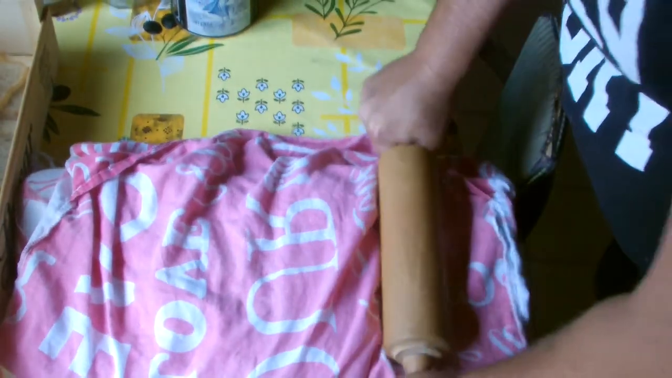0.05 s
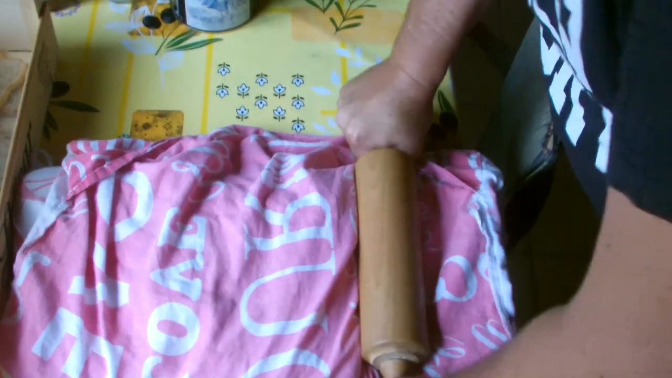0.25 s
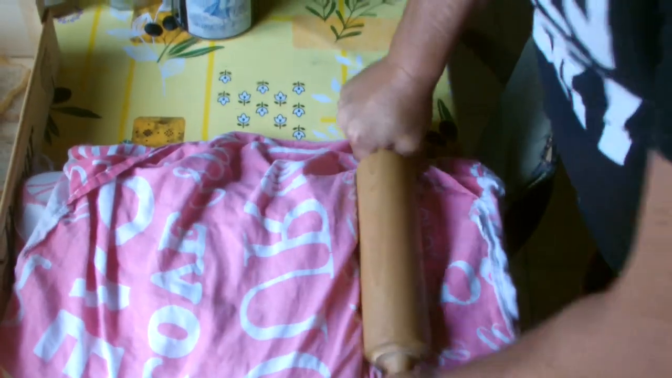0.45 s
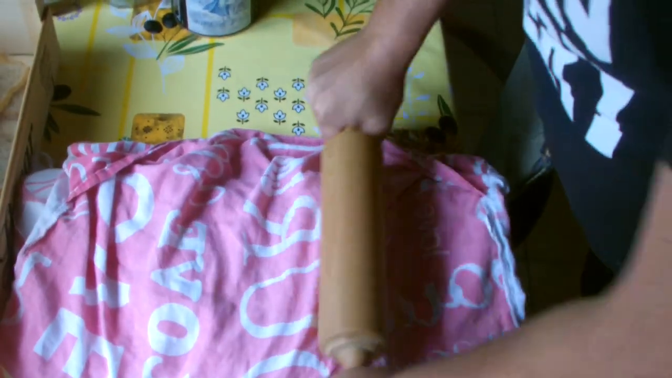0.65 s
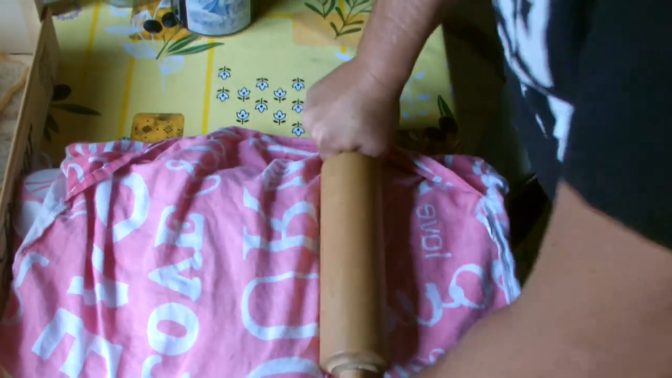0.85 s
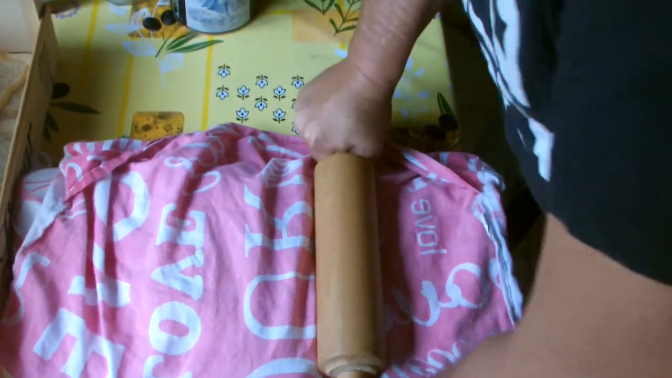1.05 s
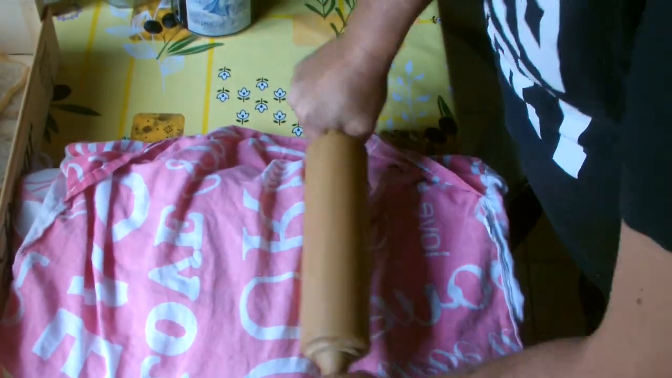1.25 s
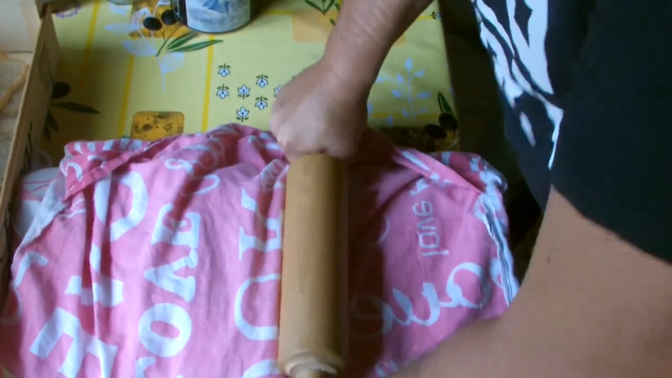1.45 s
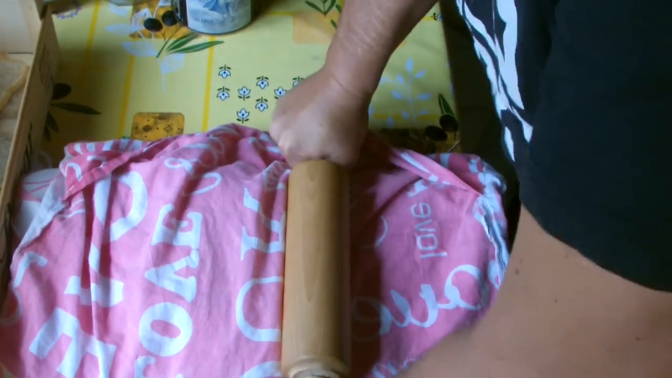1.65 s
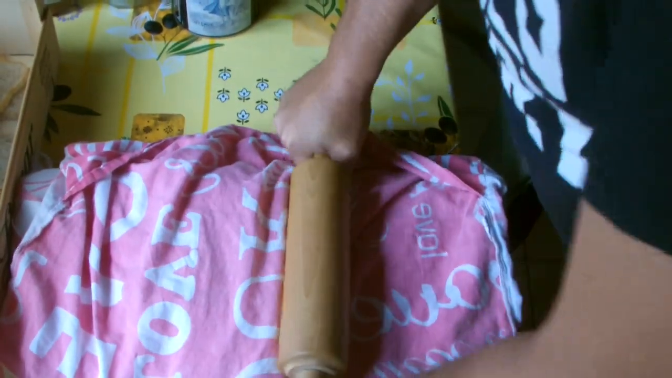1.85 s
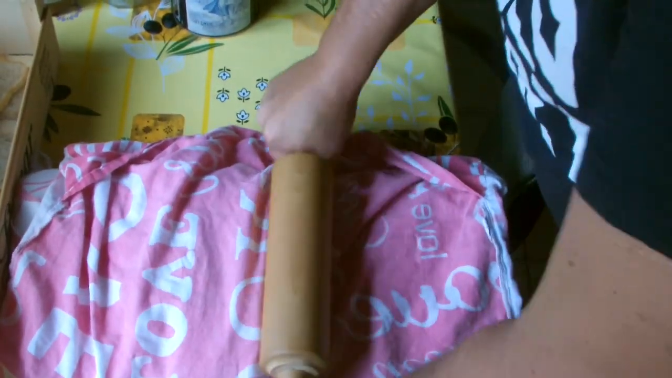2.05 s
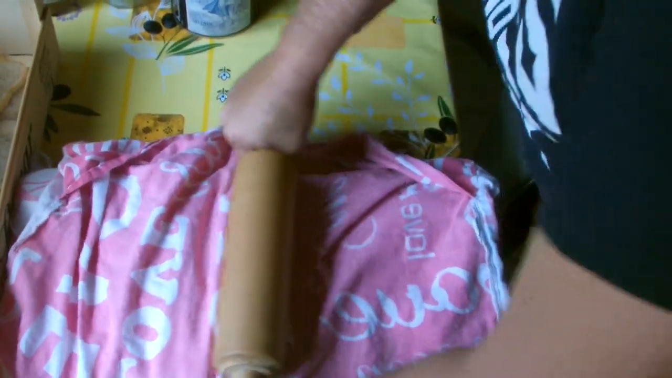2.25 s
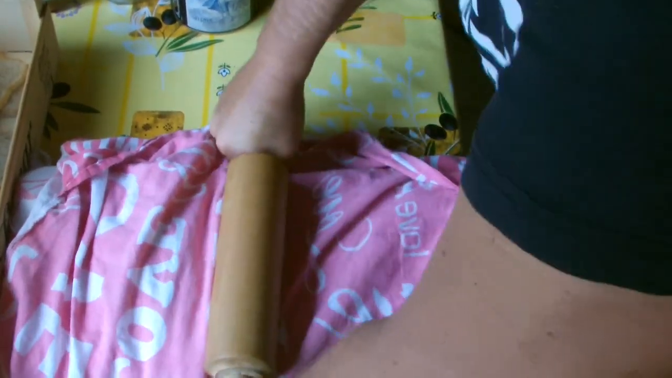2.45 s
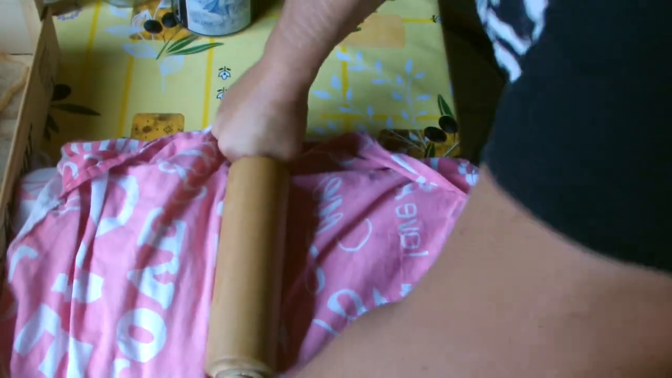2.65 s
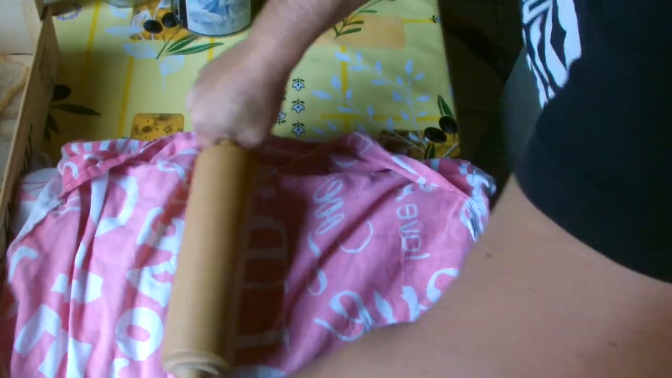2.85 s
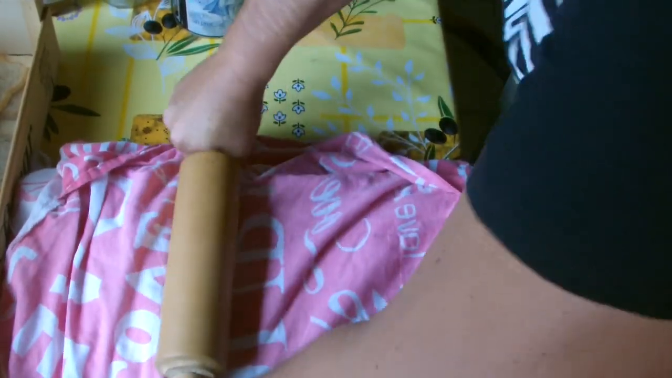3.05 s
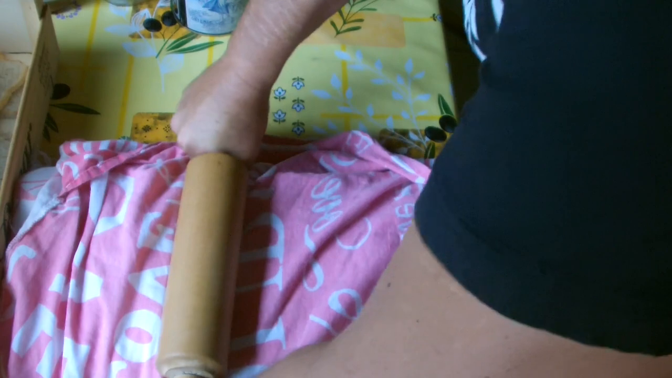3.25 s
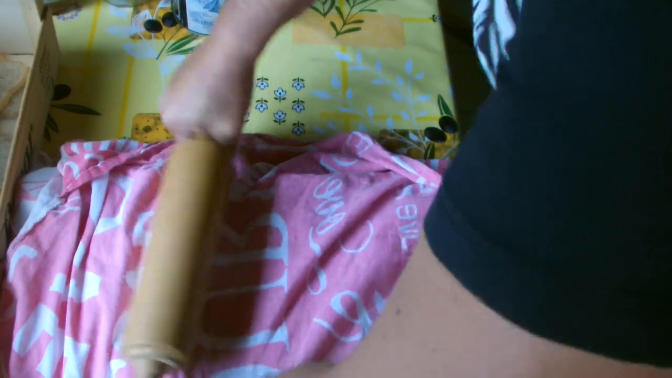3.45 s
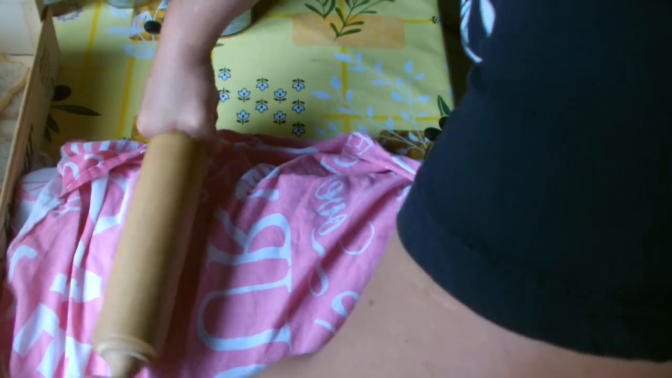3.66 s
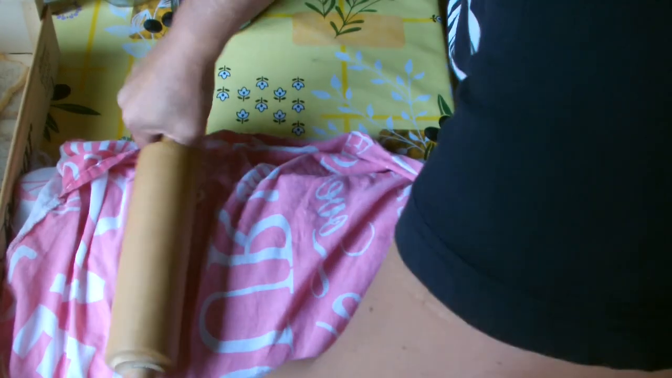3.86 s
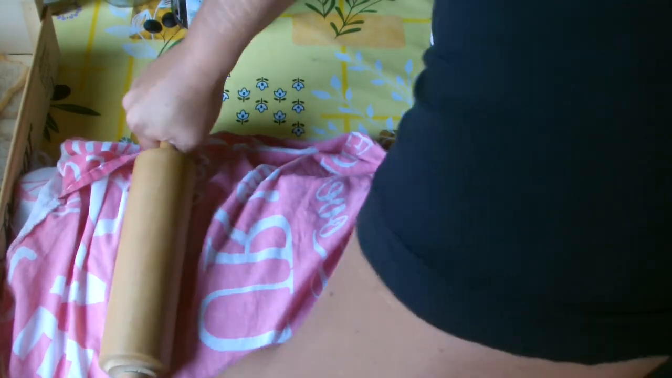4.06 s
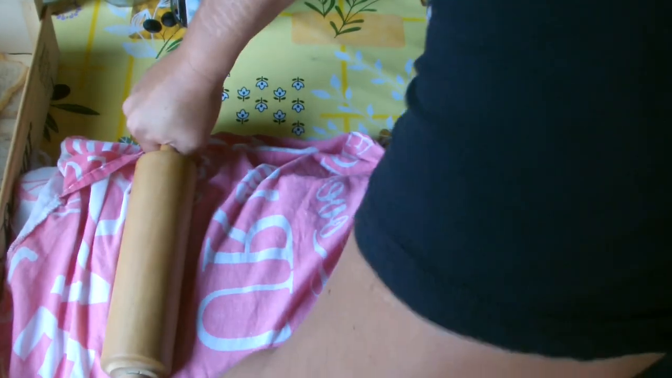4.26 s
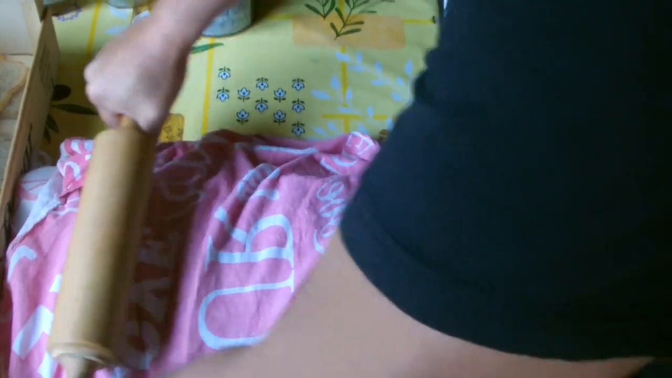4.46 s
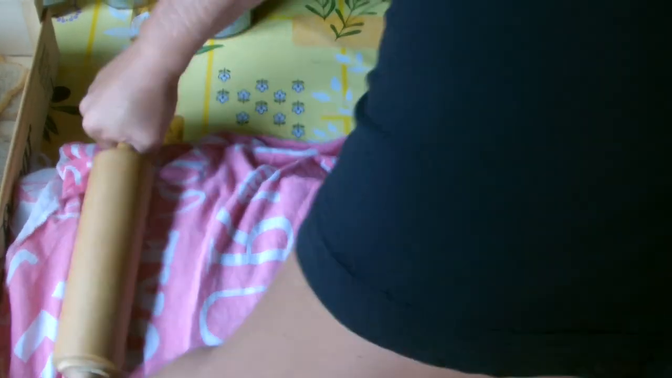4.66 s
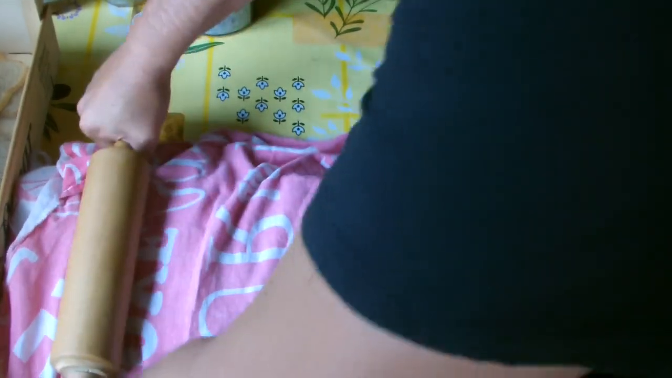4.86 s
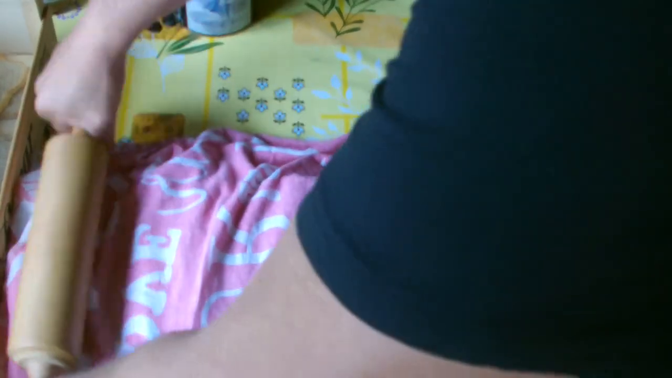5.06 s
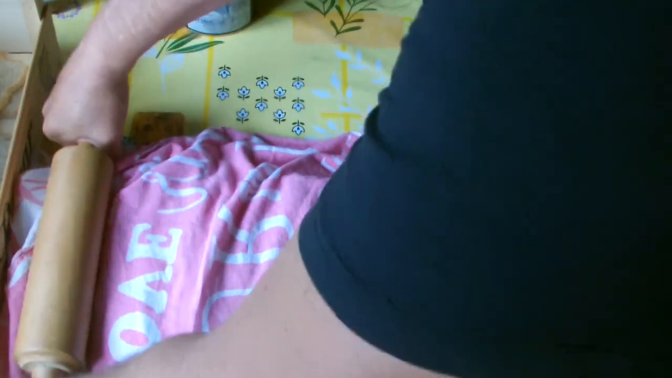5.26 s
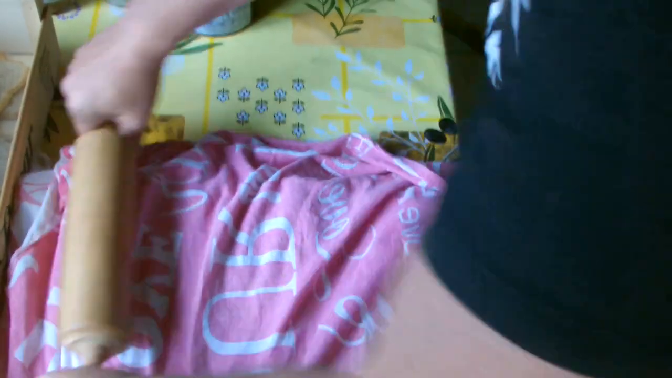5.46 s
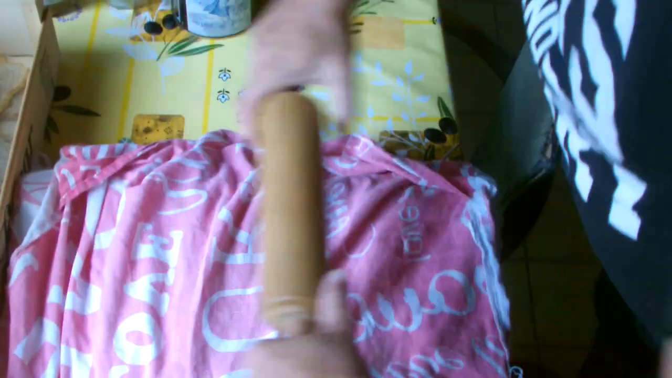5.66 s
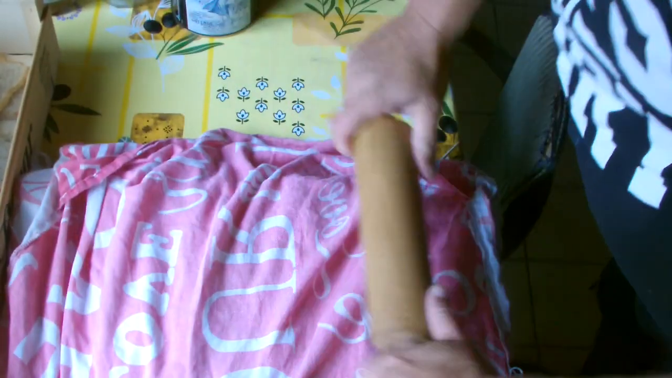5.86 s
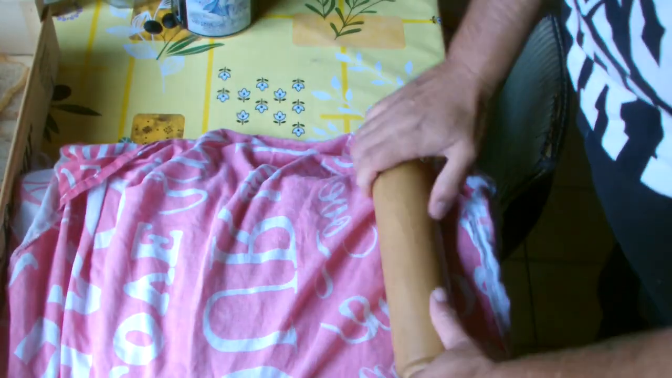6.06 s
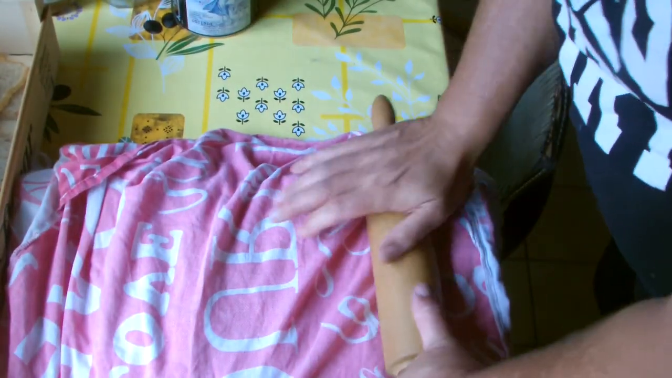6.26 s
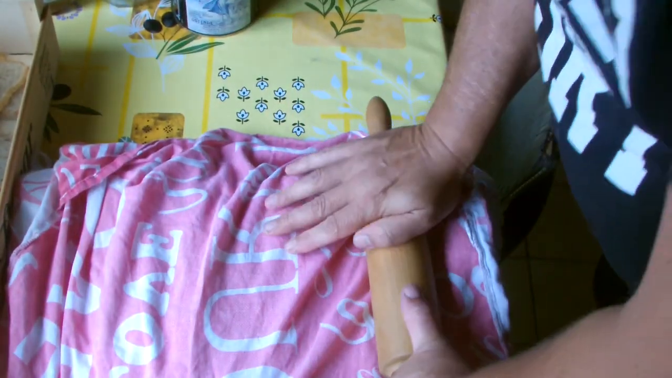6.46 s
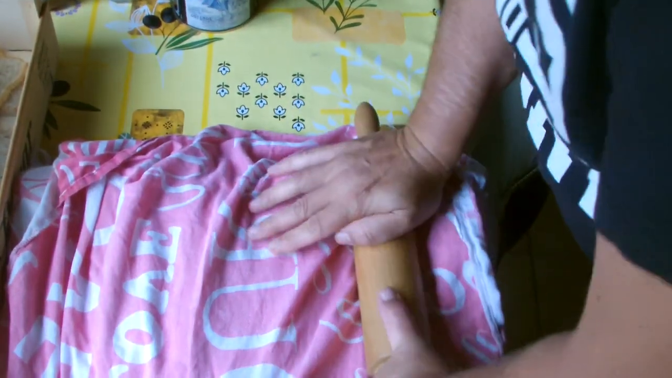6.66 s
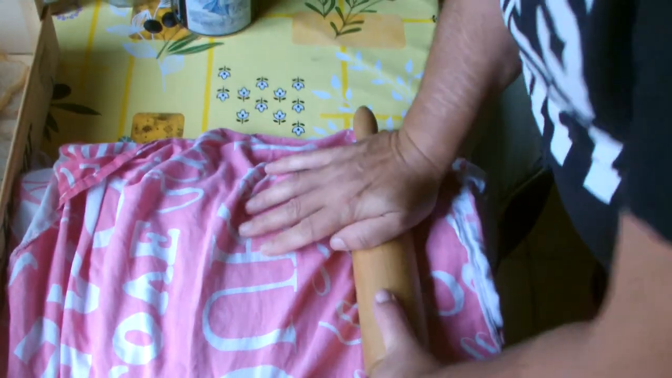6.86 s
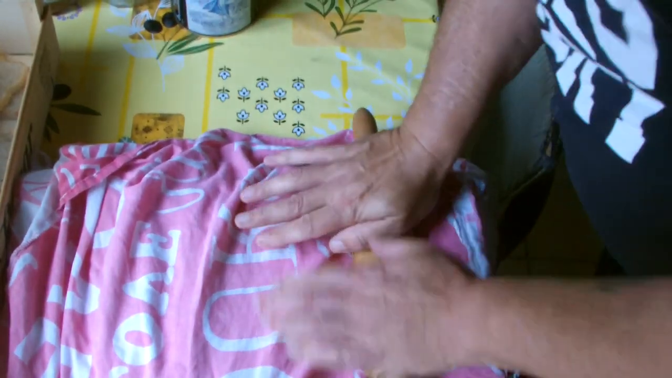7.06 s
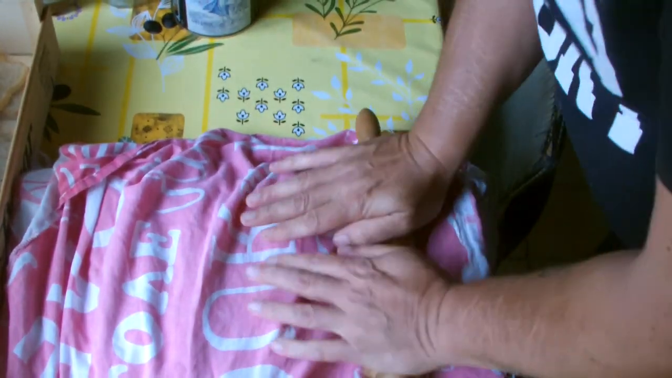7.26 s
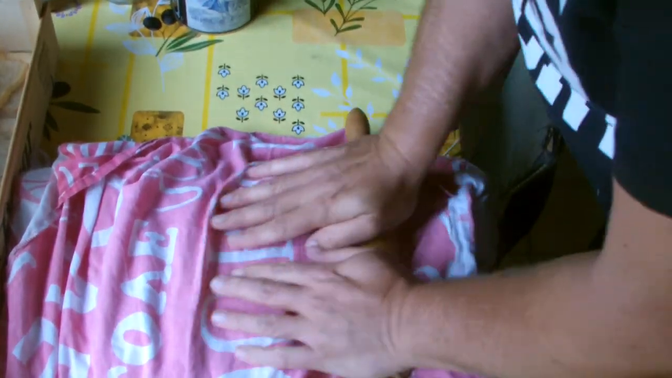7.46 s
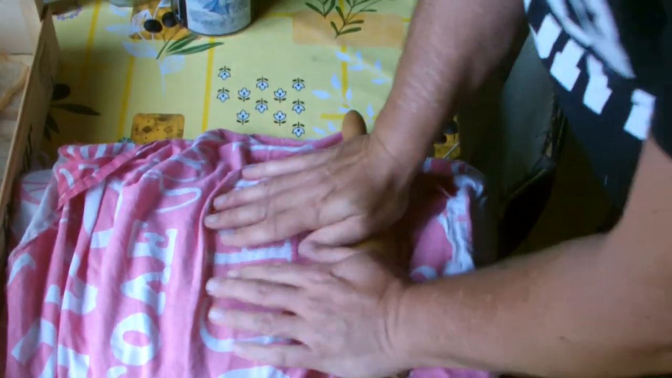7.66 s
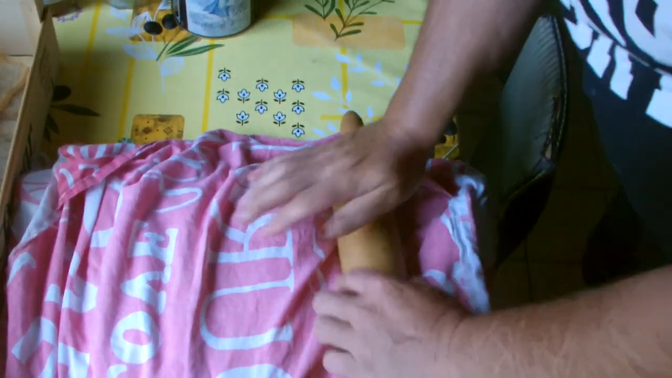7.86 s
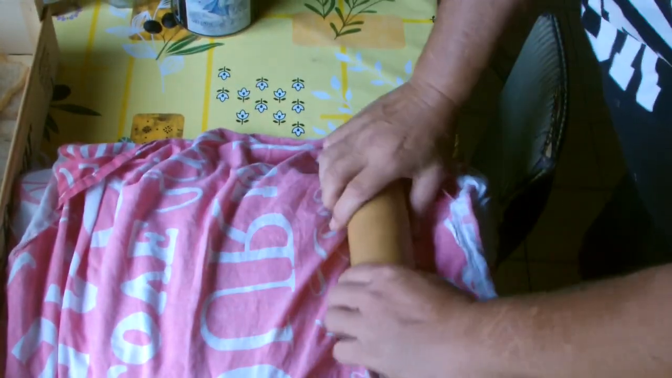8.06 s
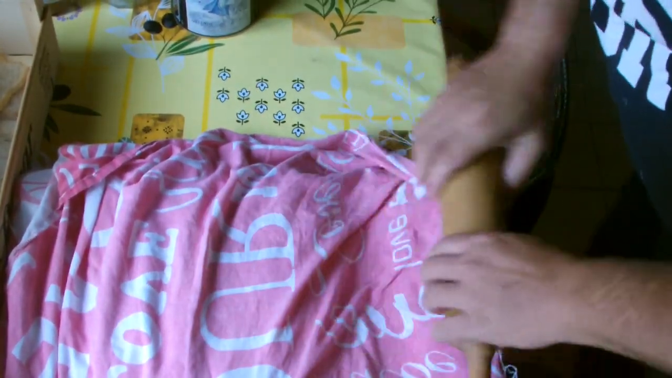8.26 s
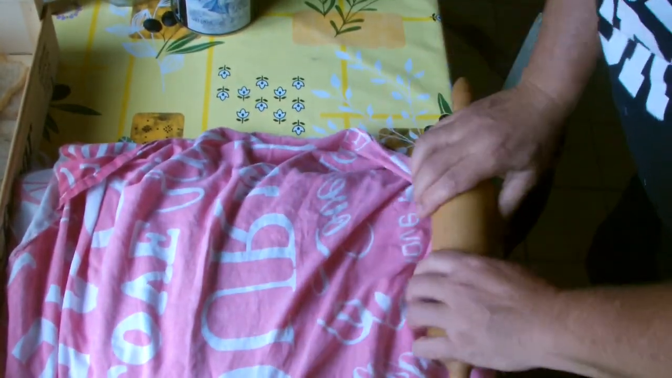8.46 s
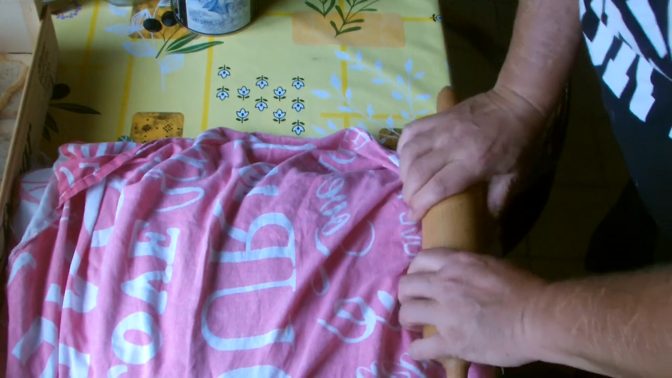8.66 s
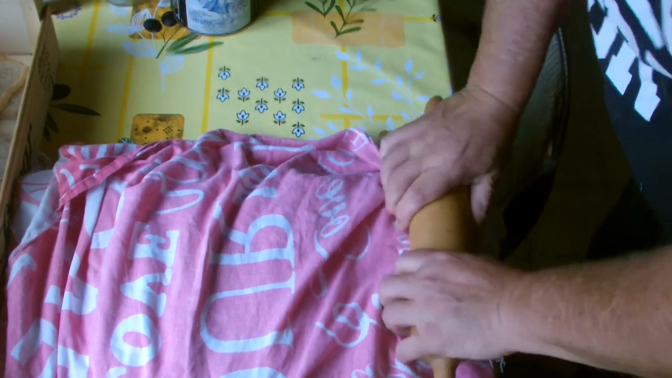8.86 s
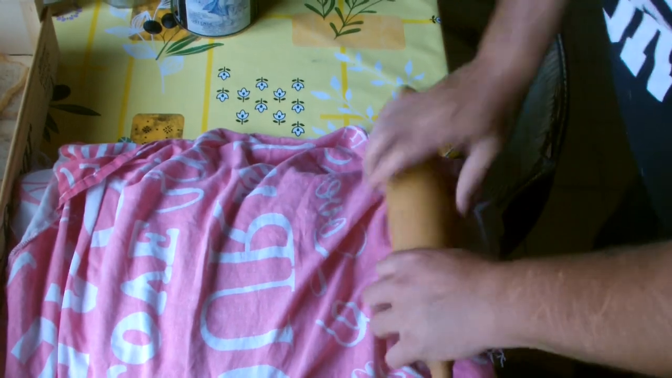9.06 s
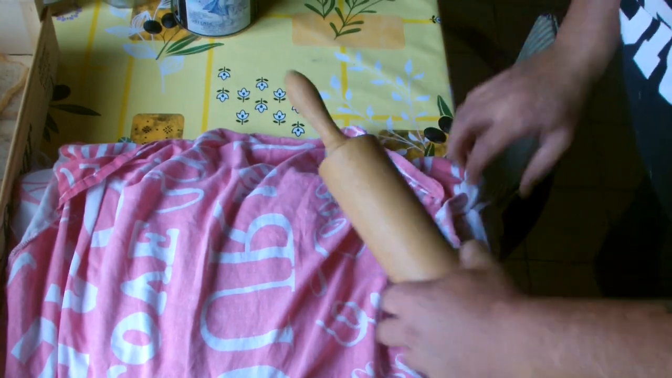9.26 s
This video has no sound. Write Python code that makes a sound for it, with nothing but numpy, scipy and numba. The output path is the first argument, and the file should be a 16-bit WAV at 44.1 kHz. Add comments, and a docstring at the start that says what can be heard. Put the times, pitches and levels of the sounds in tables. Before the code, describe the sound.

Close to a phone in a small hard kitchen, a wooden rolling pin crushes dry bread in a cloth bag. A loud crunch opens at 0.1 s; woody handle clicks follow near 0.35 and 0.6, then dense crackling and sharp snaps from 0.6 to 0.9. More crunches come at 1.3, 1.45 and 2.3 to 2.6, with dull table knocks. It quietens around 3.4, a click at 3.5, then grinding crunches at 4.0, 4.45, 4.65 and 5.0 to 5.2, with a barely audible breathy squeak near 4.2 and 4.8. From 5.3 to 6.2 there is mostly faint rustling. Strong crunches hit at 6.4 to 6.5 and, sharpest, 7.3 to 7.4, after a tiny glassy tinkle at 7.15. Small clicks and knocks follow, lighter crackling at 8.2 to 8.65, a knock and click at 8.93, then faint settling over low hiss and a thin whine.

```python
"""Dry bread grinds and hisses in a cloth bag as a wooden rolling pin leans on it, on a kitchen table.
Filtered bursts of tiny fractures make the crumbs; runs of damped sines make the snapping crusts.
Resonant modes make the clicking pin handles, the bumped table top and a glassy tinkle;
narrow noise makes a faint squeak. A small hard room, built from decaying noise, rings on
over a faint hiss and a thin whine, all heard through a phone close by."""
import sys
import numpy as np
from scipy import signal
from scipy.fft import rfft, irfft
from scipy.io import wavfile
from scipy.ndimage import uniform_filter1d
from numba import njit

SR = 44100
rng = np.random.default_rng(int(sys.argv[2]) if len(sys.argv) > 2 else 0)


def pcm_store(signal):
    """Save signal as 16-bit PCM."""
    levels = np.round(np.clip(np.atleast_2d(signal), -1, 1) * 32767)
    wavfile.write(sys.argv[1], SR, levels.astype(np.int16).T)


N = 411012
T = np.arange(N) / SR

# pushes of the pin, before layer trims: full_force_s, grind_db, swell_per_20db_s (limited in effort),
# held_s, hiss_above_grind_db, fineness_db_per_octave
PUSHES = [(0.1, -26.5, .2, 0.036, -6.5, -1), (0.362, -42.5, .1, 0.016, -8, 2),
          (0.611, -29, 0.05, 0.038, -8, -1.5), (0.725, -31, .1, 0.04, -6.5, -2),
          (0.82, -32, .12, 0.06, -6.5, -1), (1.05, -42.5, 0.6, 0.0022, -12, -1.5),
          (1.285, -38, .022, .01, -3, 0), (1.318, -28, .045, .005, -11, -5),
          (1.444, -34, 0.1, 0.071, -5, 1.5), (1.728, -42.5, .015, .015, -16, -2.5),
          (1.98, -43, 0.15, 0.018, -4.5, -0.5), (2.06, -48, 0.2, 0.048, -2.5, -2.5),
          (2.19, -41, 0.3, 0.012, -4, -1.5), (2.292, -36, 0.15, 0.03, -6, 0),
          (2.45, -32.5, 0.05, 0.021, -7, 1.5), (2.62, -46.5, 0.2, 0.032, -7, -0.5),
          (2.88, -44, 0.2, 0.016, 2, -3.5), (2.99, -38, 0.3, .04, -9, -0.5),
          (3.129, -43.5, 0.2, 0.041, -6.5, -3), (3.44, -58, 0.3, .05, -3.5, -1),
          (3.53, -55.5, 0.16, 0.017, -1.5, -8.5), (3.654, -47, 0.1, 0, -2, -2),
          (3.88, -39.5, .05, .015, -1, 2), (3.998, -35, 0.23, 0.055, -4.5, -2.5),
          (4.45, -37, .045, .075, -5, -5.5), (4.634, -40.5, 0.54, 0.023, -2.5, 0),
          (5.028, -37, 0.1, 0.019, -4, -3), (5.184, -42, 0.25, 0.0027, -4.5, 2),
          (5.95, -48.5, 0.07, 0.015, 1, -2.5), (6.03, -56, 0.25, 0.02, 0.5, -0.5),
          (6.22, -44.5, .08, .005, -4.5, -2), (6.285, -50, 0.5, 0.014, -5, 0.5),
          (6.394, -34, 0.07, .03, -4, -0.5), (6.5, -24, .07, 0.018, -10.5, -1.5),
          (6.66, -52, .2, .04, -3.5, 0.5), (7.15, -56, 0.1, .04, 1, -1), (7.29, -31, 0.2, 0.055, -6, -2),
          (7.361, -25.5, 0.05, 0.018, -12.5, -1), (7.74, -57, .1, 0.049, -14, -7.5),
          (7.82, -53, 0.3, 0.02, -3.5, -1.5), (8.225, -40, .02, .1, -1, -0.5), (8.43, -40.5, 0, 0, -4.5, 2),
          (8.66, -41.5, 0.36, 0.044, -1.5, 3), (8.81, -48, 0, 0.0048, -1, 2.5),
          (8.935, -43, .015, .015, -10, -1.5), (9.315, -55, .1, .01, -2, 1.5)]
# bag shifting and settling between pushes: time_s, grind_db, hiss_above_grind_db
SETTLING = [(0., -66, 5), (0.55, -88, -1.5), (0.95, -58, 3), (1.24, -85, 11), (1.86, -69.5, 1.5),
            (2.3, -62, 0), (2.76, -67.5, 8.5), (3.28, -68.5, 1), (4.201, -62, 8), (5.42, -68.5, 2.5),
            (5.75, -84.5, 7.5), (6.3, -64, -1), (6.96, -80, 2), (7.55, -63, 0), (8.05, -80, -8),
            (8.6, -60, 1), (9.11, -76.5, 13.5), (9.32, -69.5, 9)]
SETTLING_FINE_DB_PER_OCT = 0
FADE_DB_PER_S, CRUMB_FADE_DB_PER_S = 250, 194  # once a push is let go
BITE_DB, BITE_STEEPER = 20, 3.9  # the swell sets in abruptly this far under full force
# grinding spectrum: freq_hz, relative_density_db
GRIND_SPECTRUM = [(88, -32.5), (150, -30), (226, -9.5), (384, -10.5), (492, 0), (605, -1.5), (1550, 0),
                  (2010, -0.5), (5000, -13), (6500, -45), (11000, -120)]
# crumb hiss spectrum: freq_hz, relative_density_db
HISS_SPECTRUM = [(1760, -22.5), (3000, -7.5), (4260, -10), (9480, -4.5), (15600, -29)]
# table top rings more where the pin works far from its legs: time_s, above_grind_db
TABLE_RING = [(0., -11), (1.5, -15), (2.2, -5), (2.5, -17.5), (3.6, -3.5), (4.5, -5), (5.2, -6), (6.4, -19),
              (7.4, -14.5), (8.5, -11.5), (9.3, -9.5)]
# table top modes: freq_hz, level_db, t60_s
TABLE_MODES = [(118, -20, 0.14), (230, -23, 0.44), (290, -16.5, 0.064), (370, -12.5, 0.04),
               (436.5, -10, 0.041), (576, -11, 0.028), (692, -14.5, 0.046), (851, -13.5, 0.026)]
# the whole table giving under the weight: freq_hz, relative_density_db
THUD_SPECTRUM = [(40, -6.5), (75, 8), (130, -1), (260, -8.5), (500, -30.5)]
THUD_ABOVE_RING_DB = 2
# crusts that snap: start_s, level_db, crisp_treble_db, run_ms
SNAPS = [(0.043, -26, -6, 12), (0.614, -23, -16, 20), (0.718, -12, 0, 6), (0.746, -18, -6, 16),
         (0.804, -21, -3, 4), (0.828, -16, -3, 22), (0.867, -16, -8, 7), (1.317, -18, -24, 16),
         (1.434, -22, -13, 10), (1.504, -18, -25.5, 16), (1.975, -25, 8.5, 5), (2.288, -18, 2, 16),
         (2.325, -24, -14, 16), (2.449, -19, -12, 9), (2.483, -20, -9.5, 16), (2.52, -26, -14, 16),
         (2.605, -27, -16, 20), (2.645, -30, -12, 16), (2.875, -24, -7, 8), (2.975, -21, -9, 10),
         (3.885, -28, -11, 10), (3.982, -17, -8, 14), (4.469, -21, -9, 22), (4.503, -19.5, -13, 22),
         (4.63, -21, -18.5, 14), (5.046, -26, -19, 14), (5.186, -27, -7, 10), (6.381, -24, -6, 8),
         (6.397, -20, 3, 10), (6.474, -21, -13, 14), (7.155, -44, 8, 8), (7.208, -36, 2, 6),
         (7.228, -29, -21, 8), (7.269, -23, -16, 8), (7.286, -25, -7, 12), (7.37, -10.5, -14.5, 7),
         (7.381, -14, -18, 20), (8.245, -31, -8, 10), (8.305, -30, -4, 34), (8.42, -26, -8, 12),
         (8.511, -25.5, -9, 10), (8.624, -25.5, -16, 12)]
SNAP_CLOTH_DB_PER_OCT = 4.5
# pin clicking on its handles: start_s, level_db, strongest_ring_hz
CLICKS = [(0.335, -25, 1100), (0.3597, -20, 3000), (0.3667, -17, 2400), (0.5883, -15, 3530),
          (1.0228, -23.5, 1228), (1.0544, -22, 3000), (1.0642, -16, 3300), (1.282, -18, 3810),
          (1.724, -22, 1101), (3.39, -29.5, 2130), (3.5247, -23.5, 2300), (4.4269, -15, 3800),
          (4.9483, -19.5, 3800), (4.9722, -21.5, 3880), (5.565, -31, 1680), (5.9453, -37, 2010),
          (6.867, -39, 1100), (7.0929, -35, 1860), (7.1366, -33, 2300), (7.774, -36, 3700),
          (7.7815, -33, 1700), (7.79, -37, 2350), (7.839, -34, 1300), (8.1055, -31, 3300),
          (8.128, -40, 1300), (8.203, -37, 1820), (8.9301, -21, 1130)]
# wooden pin modes: freq_hz, level_db, t60_s
PIN_MODES = [(1070, -5, 0.016), (1304, -10, 0.02), (1720, -8.5, 0.015), (1900, -10, 0.014),
             (2330, -10, 0.015), (2750, -13, 0.01), (3200, -11, 0.014), (3500, -9.5, 0.014),
             (3850, -9.5, 0.012)]
PIN_TOP_HZ = 4400  # the contact is too soft to reach higher
# pin bumping the table through the cloth: start_s, level_db, contact_ms
BUMPS = [(1.034, -26.5, 0.78), (1.265, -42, 0.98), (1.44, -21, 0.51), (1.732, -22, 0.3), (1.971, -29, 1),
         (2.606, -26.5, 0.99), (2.873, -27, 0.9), (3.979, -28, 0.9), (6.778, -39, 1), (7.022, -30, 1),
         (7.397, -21, .3), (7.7235, -30, .3), (7.735, -27, 0.9), (8.42, -23.5, 0.78), (8.938, -20.5, 0.26)]
# faint breathy squeak: time_s, level_db
SQUEAK_SWELL = [(4.15, -75), (4.225, -52), (4.3, -56), (4.4, -78), (4.7, -85), (4.81, -60), (4.88, -80)]
SQUEAK_HZ, SQUEAK_WIDTH_HZ = 2550, 90
# something glassy jolted on the table: start_s, level_db
TINKLES = [(7.1366, -35), (7.153, -35)]
TINKLE_HZ, TINKLE_T60_S = 1303, 0.13
ROOM_T60_S, ROOM_TOP_T60_S = .34, .32
ROOM_LOW_HZ, ROOM_SPLIT_HZ = 270, 3000
ROOM_DB, PIN_ROOM_DB = -0.43, -1
# side signal against mid, at the two ports: freq_hz, gain_db
PORTS = [(60, 2.5), (110, -12), (200, -14), (380, -22), (700, -19), (1290, -23.5), (2380, -22),
         (4400, -9.5), (8120, -3.5), (15000, -0.5)]
# the right port is the more open one: freq_hz, gain_db
RIGHT_TREBLE = [(6000, 0.), (14000, 1.5)]
# background hiss spectrum: freq_hz, relative_density_db
AIR_SPECTRUM = [(12, -31), (20, 8), (171, -8.5), (333, 1), (1130, -1.5), (1930, -8), (4200, -13),
                (9170, -10), (15600, -15)]
AIR_DB = -62
WHINE_HZ, WHINE_DB = 1934, -72  # level before its wavering
LOW_CUT_HZ, TOP_HZ = 180, 15750


def undb(db):
    """Amplitude ratio of a level in dB."""
    return 10 ** (np.asarray(db) / 20)


def unit(x):
    """Scale to an RMS of one."""
    return x / np.sqrt(np.mean(x ** 2))


def colour(x, points):
    """Causal filter through (Hz, dB) points, built from the cepstrum of the log gain."""
    hz, db = np.transpose(points)
    size = 2 ** 13
    grid_hz = np.maximum(np.arange(size // 2 + 1), 1) * SR / size
    gain_db = np.interp(np.log(grid_hz), np.log(np.maximum(hz, 1)), db)
    ceps = irfft(np.log(undb(gain_db)))
    # fold onto positive time: minimum phase
    ceps[1:size // 2] *= 2
    ceps[size // 2 + 1:] = 0
    impulse = irfft(np.exp(rfft(ceps)))[:size // 2]
    return signal.fftconvolve(x, impulse)[:N]


@njit
def grains(count, at, hz, t60, size):
    """Each grain is a damped sine that starts at once and stops after its t60."""
    out = np.zeros(count)
    for k in range(len(at)):
        p = np.exp((2j * np.pi * hz[k] - np.log(1000) / t60[k]) / SR)
        z = size[k] + 0j
        for i in range(int(at[k] * SR), min(count, int((at[k] + t60[k]) * SR))):
            out[i] += z.imag
            z *= p
    return out


def crackle(scatter_db, count):
    """Tiny fractures: impulses at random moments, of uneven size and either sign."""
    at, size, sign = rng.random((count, 3)).T
    out = np.zeros(N)
    np.add.at(out, (at * N).astype(int), np.sign(sign - .5) * undb(scatter_db * size))
    return unit(out)


def flutter(rate_hz, depth_db):
    """Gain that steps, slightly smoothed, to a new random level rate_hz times a second."""
    hold = int(SR / rate_hz)
    steps = np.repeat(rng.standard_normal(N // hold + 1), hold)
    return undb(depth_db * uniform_filter1d(steps, hold // 4)[:N])


def ring(events_s, gains, modes, detune):
    """Every blow rings all modes, with gains[blow, mode], either sign and shifted pitches."""
    hz, db, t60_s = np.transpose(modes)
    shift, sign = rng.standard_normal((2,) + gains.shape)
    at_s = np.repeat(events_s, len(hz))
    pitch_hz = hz * (1 + detune * shift)
    size = np.sign(sign) * gains * undb(db)
    return grains(N, at_s, pitch_hz.ravel(), np.tile(t60_s, len(events_s)), size.ravel())


def effort():
    """Grinding, hiss and fineness in dB: pushes swell, hold and fade over the settling bag."""
    t = T[::64]
    s, db, swell_s, held_s, hiss_db, fine_db = np.transpose(PUSHES)[:, :, None]
    rising_db = 20 * np.maximum(s - t, 0) / np.clip(swell_s, .01, .35)
    rising_db = rising_db + BITE_STEEPER * np.maximum(rising_db - BITE_DB, 0)
    gone_s = np.maximum(t - s - np.maximum(held_s, 0), 0)
    push_power = undb(2 * (db - rising_db - FADE_DB_PER_S * gone_s))
    push_hiss = undb(2 * (db + hiss_db - rising_db - CRUMB_FADE_DB_PER_S * gone_s))

    calm_s, calm_db, calm_hiss_db = np.transpose(SETTLING)
    calm_power = undb(2 * np.interp(t, calm_s, calm_db))
    calm_hiss = undb(2 * np.interp(t, calm_s, calm_db + calm_hiss_db))

    grind = push_power.sum(axis=0) + calm_power
    hiss = push_hiss.sum(axis=0) + calm_hiss
    # fineness averaged by power
    fine = ((push_power * fine_db).sum(axis=0) + calm_power * SETTLING_FINE_DB_PER_OCT) / grind
    return [np.interp(T, t, c) for c in (10 * np.log10(grind), 10 * np.log10(hiss), fine)]


def fragments(fine_db, count):
    """Each fragment that breaks rings a few cycles at its own pitch; fineness tilts their levels."""
    at, octave, size, sign = rng.random((count, 4)).T
    at_s = at * T[-1]
    octave = 5 * octave - 2.3
    hz = 1000 * 2 ** octave
    db = 11.5 * size ** 3 + np.interp(at_s, T, fine_db) * octave
    strike = np.sign(sign - .5) * hz
    even = grains(N, at_s, hz, 7. / hz, strike)  # level reference without the tilt
    return grains(N, at_s, hz, 6.9 / hz, strike * undb(db)) / np.std(even)


def spurts(kick_db, fade_s, count):
    """Gain that leaps whenever a cluster of crumbs gives way, then dies back."""
    at, size = rng.random((count, 2)).T
    kicks = np.zeros(N)
    np.add.at(kicks, (at * N).astype(int), undb(kick_db) * size ** 2)
    keep = np.exp(-1 / (fade_s * SR))
    return 1 + signal.lfilter([1], [1, -keep], uniform_filter1d(kicks, 90))


def table_top(load):
    """Steady load rings the modes of the table; a mode that lasts t60 s is 2.2 / t60 Hz wide."""
    out = 0
    for hz, db, t60_s in TABLE_MODES:
        resonator = signal.iirpeak(hz, hz * t60_s / 2.2, fs=SR)
        out = out + undb(db) * np.sqrt(t60_s) * signal.lfilter(*resonator, load)
    return out


def crush():
    """Bread breaks up under the pin in bursts; fine crumbs hiss; the table top rings with the load."""
    grind_db, hiss_db, fine_db = effort()
    table_db = grind_db + np.interp(T, *np.transpose(TABLE_RING))
    bursts = flutter(40., 2.) * spurts(6., .006, count=700)
    grind = unit(colour(fragments(fine_db, count=14000), GRIND_SPECTRUM) * bursts)
    hiss = unit(colour(crackle(21.5, count=80000), HISS_SPECTRUM) * bursts ** 1.21)
    load = crackle(4.4, count=9000)
    top = table_top(load * undb(table_db + 2.0)) / np.std(table_top(load))
    thud = unit(colour(crackle(23.4, count=1500), THUD_SPECTRUM) * bursts)
    bread = undb(grind_db + 0.75) * grind + undb(hiss_db + 2.0) * hiss
    return bread + top + undb(table_db + THUD_ABOVE_RING_DB) * thud


def snaps():
    """A crust gives way in a quick fading run of cracks, each a few cycles long; crisp ones reach higher."""
    cracks = 40
    s, db, crisp_db, run_ms = np.transpose(SNAPS)[:, :, None]
    lag, spread, size = np.moveaxis(rng.random((len(SNAPS), cracks, 3)), 2, 0)
    lag = lag ** 1.5  # share of the run
    octave = (np.arange(cracks) + spread) / 8
    hz = 420 * 2 ** octave
    # the cloth holds back cracks below 1.7 kHz
    crisp = crisp_db * np.clip((octave - 2) / 2, 0, 1)
    cloth_db = SNAP_CLOTH_DB_PER_OCT * np.maximum(2 - octave, 0)
    gain = undb(db + crisp - cloth_db - 8 * lag - 6 * size) * (-1.) ** np.arange(cracks)
    at_s = s + lag * run_ms / 1000
    return grains(N, at_s.ravel(), hz.ravel(), (6. / hz).ravel(), gain.ravel())


def clicks():
    """Wood on wood: modes near the pitch of the click are driven hardest."""
    s, db, hz = np.transpose(CLICKS)
    octaves = np.abs(np.log2(np.array(PIN_MODES)[:, 0] / hz[:, None]))
    mode_db = db[:, None] - 7. * octaves + 2 * rng.standard_normal(octaves.shape)
    rung = ring(s, undb(mode_db), PIN_MODES, detune=.025)
    return signal.sosfilt(signal.butter(6, PIN_TOP_HZ, fs=SR, output="sos"), rung)


def bumps():
    """Blows ring the table top; a longer contact weakens its higher modes."""
    s, db, ms = np.transpose(BUMPS)
    soft = 1 / (1 + (np.array(TABLE_MODES)[:, 0] * ms[:, None] / 1000) ** 2)
    return ring(s, undb(db[:, None]) * soft, TABLE_MODES, detune=.013)


def squeak():
    """Noise in one narrow resonance, swelling and fading."""
    s, db = np.transpose(SQUEAK_SWELL)
    resonator = signal.iirpeak(SQUEAK_HZ, SQUEAK_HZ / SQUEAK_WIDTH_HZ, fs=SR)
    band = signal.lfilter(*resonator, rng.standard_normal(N))
    return unit(band) * undb(np.interp(T, s, db, left=-120, right=-120))


def tinkles():
    """One clear glassy mode, a damped sine at each jolt."""
    s, db = np.transpose(TINKLES)
    return grains(N, s, TINKLE_HZ + 0 * s, TINKLE_T60_S + 0 * s, undb(db))


def walls():
    """Decaying noise: the answer of the room to one spot; the treble dies sooner."""
    t = T[:SR // 2]
    low_band = signal.butter(2, [ROOM_LOW_HZ, ROOM_SPLIT_HZ], "band", fs=SR, output="sos")
    top_band = signal.butter(2, ROOM_SPLIT_HZ, "high", fs=SR, output="sos")
    low = signal.sosfilt(low_band, rng.standard_normal(len(t)))
    top = signal.sosfilt(top_band, rng.standard_normal(len(t)))
    tail = low * 1000. ** (-t / ROOM_T60_S) + top * 1000. ** (-t / ROOM_TOP_T60_S)
    tail = tail * np.minimum(t / .003, 1)  # 3 ms onset
    return tail / np.sqrt(np.sum(1000. ** (-2 * t / ROOM_T60_S)))


def room(dry, count=10):
    """The bread breaks at shifting spots, so the sound cycles through several answers of the walls."""
    spot = T / .04 % count  # 40 ms per spot
    out = 0
    for k in range(count):
        away = np.minimum(np.abs(spot - k), count - np.abs(spot - k))
        share = np.cos(np.pi / 2 * np.minimum(away, 1))
        out = out + signal.oaconvolve(dry * share, walls())[:N]
    return undb(ROOM_DB) * out


def air():
    """Faint hiss of coloured noise and a thin whine, a sine of wavering level."""
    whine = flutter(4., 4.) * np.sin(2 * np.pi * WHINE_HZ * T)
    hiss = unit(colour(rng.standard_normal(N), AIR_SPECTRUM))
    return undb(AIR_DB) * hiss + undb(WHINE_DB) * whine


def scene():
    """Direct sound reaches both ports alike; room reflections differ between them."""
    bag = crush() + snaps() + bumps() + squeak()
    pin = clicks() + tinkles()
    sent = bag + undb(PIN_ROOM_DB) * pin
    mid = bag + pin + room(sent)
    # the ports sit close: reflections differ most in the treble
    side = colour(room(sent), PORTS)
    return np.array([mid + side, colour(mid - side, RIGHT_TREBLE)])


def record(dry):
    """The phone thins the bass, adds its own hiss and whine, and cuts the top steeply."""
    thin = signal.sosfilt(signal.butter(3, LOW_CUT_HZ, "high", fs=SR, output="sos"), dry)
    hiss = air() + colour(air(), PORTS) * np.array([[1], [-1]])
    return signal.sosfilt(signal.ellip(10, .2, 80, TOP_HZ, fs=SR, output="sos"), thin + hiss)


dry = scene()
out = record(dry)
pcm_store(out)
```